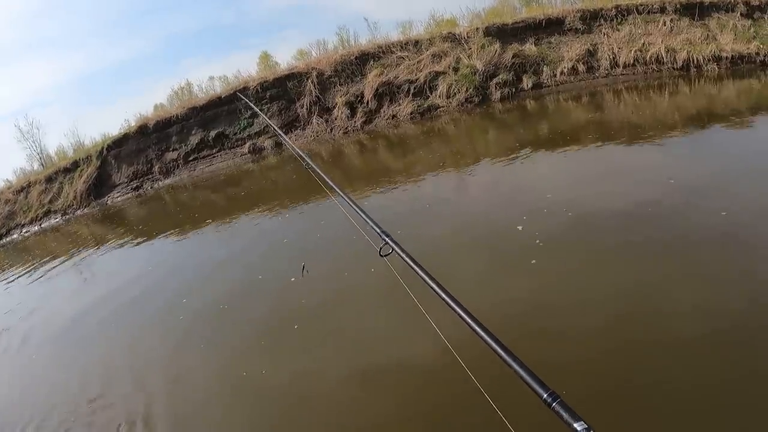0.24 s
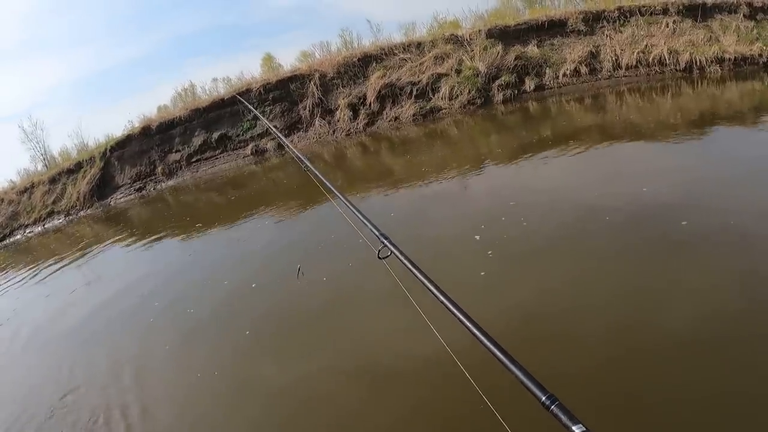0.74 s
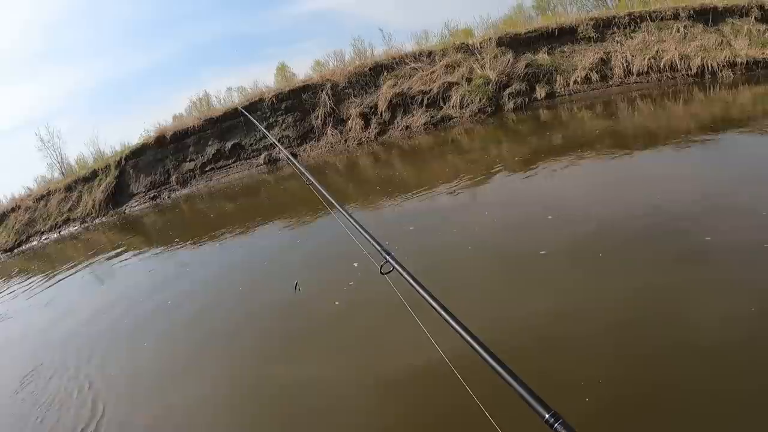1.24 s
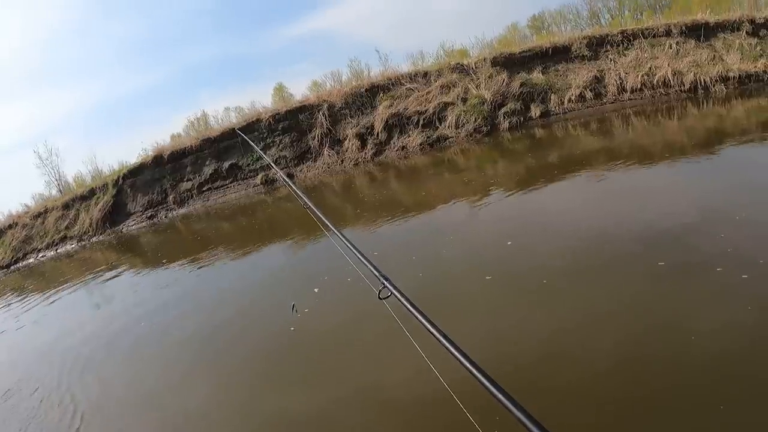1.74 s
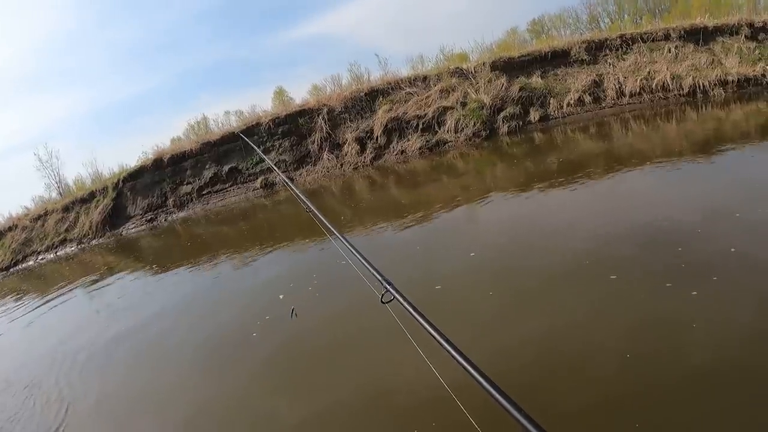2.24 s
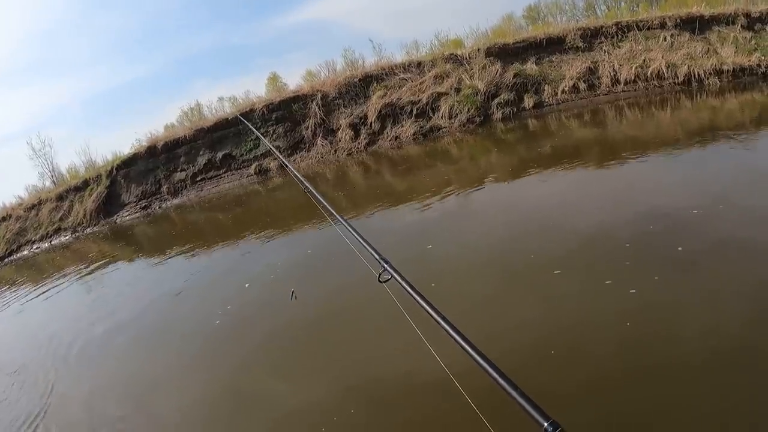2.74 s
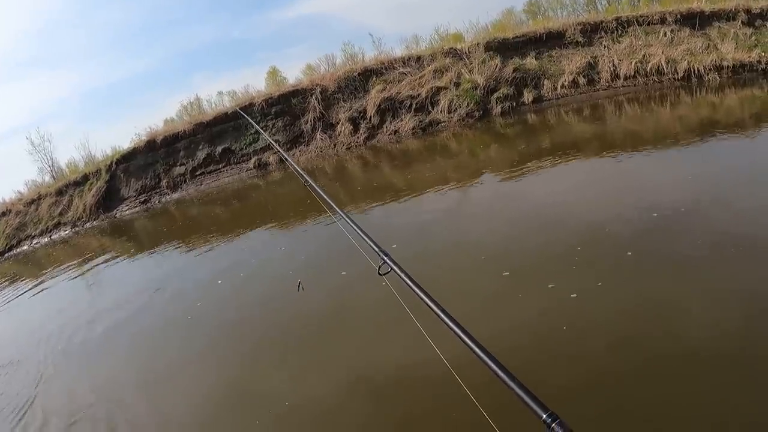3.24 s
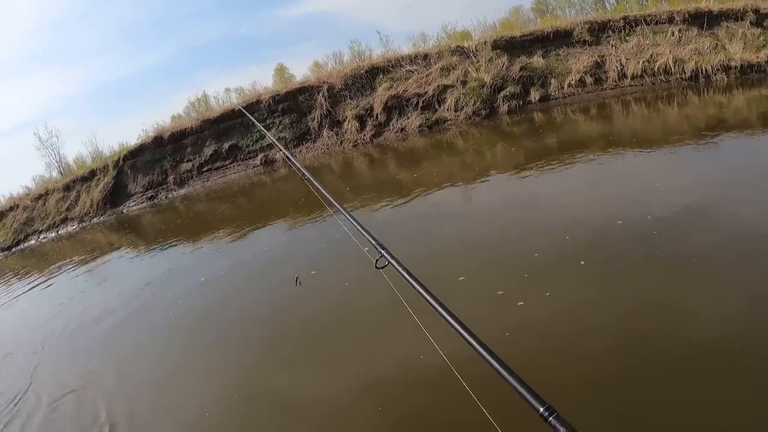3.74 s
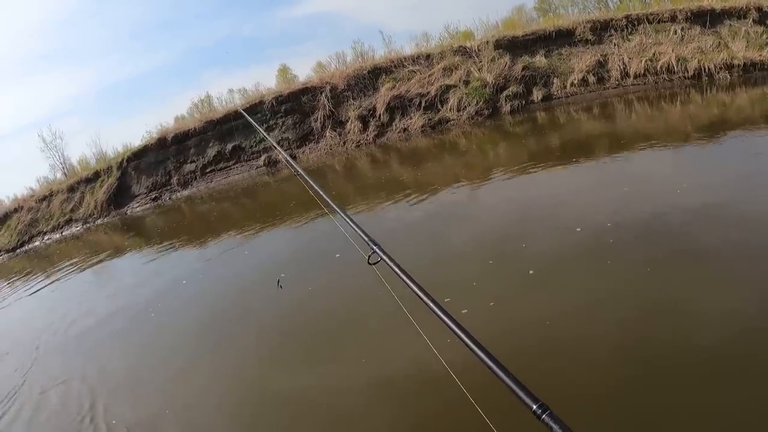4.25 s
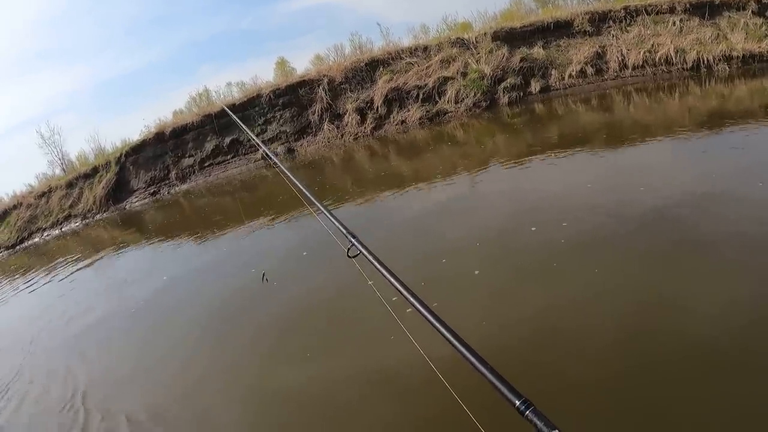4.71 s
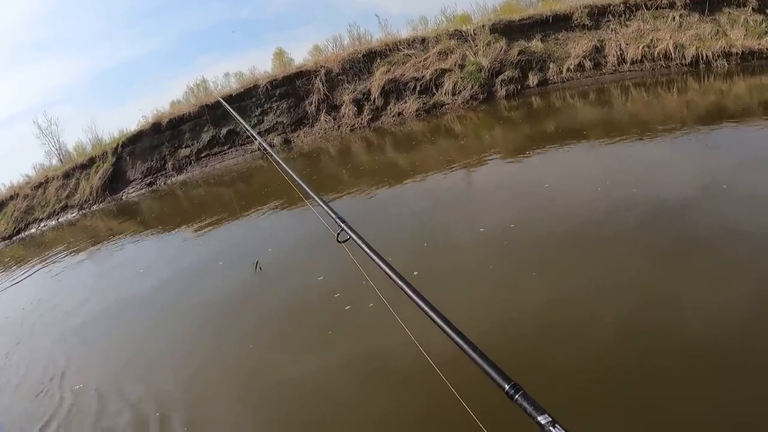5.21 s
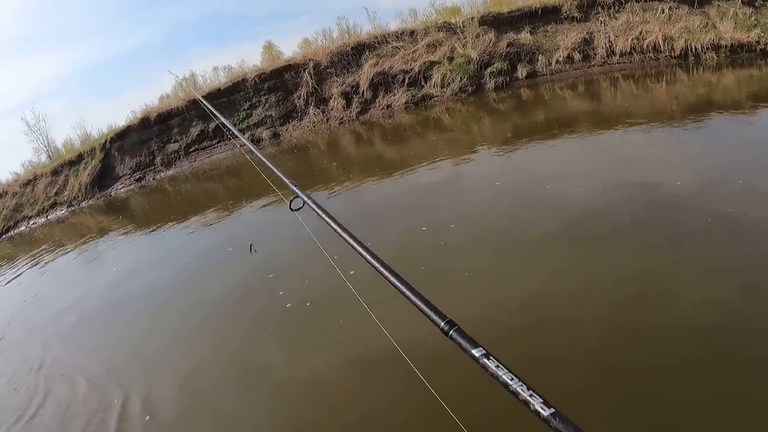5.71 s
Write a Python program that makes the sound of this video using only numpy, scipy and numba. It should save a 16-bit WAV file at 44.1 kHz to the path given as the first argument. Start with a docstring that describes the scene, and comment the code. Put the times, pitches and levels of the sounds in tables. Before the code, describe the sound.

Outdoors on a river, a wooden box turkey call gives one short cluck, then twelve raspy, evenly spaced yelps close to the microphone.

```python
"""Wind rumble and river hush, a bird trill and small gear clicks; then a turkey call close by: a cluck, twelve yelps.
Call: uneven stick-slip pulses ring a wooden box, with clean squeaks where a stroke catches, locks or lets go.
Behind it: the far bank's faint echo (scattered noise), a wavering motor drone (two sines), the trill (falling sines).
In the boat: clicks and rustles (filtered noise), knocks (decaying hull modes). Air: noise bands moved by gusts."""
import sys
import numpy as np
from scipy import signal
from scipy.io import wavfile
from scipy.ndimage import uniform_filter1d, minimum_filter1d
from numba import njit

SR = 44100
rng = np.random.default_rng(int(sys.argv[2]) if len(sys.argv) > 2 else 0)


def digitize_waveform(pressure):
    """Quantize a signal to 16-bit integers and store it at the path in sys.argv[1].

    Rows of a 2-D input are taken as channels; values are limited to [-1, 1].
    """
    field = np.atleast_2d(pressure).T
    bounded = np.clip(field, -1, 1)
    quanta = np.round(bounded * 32767).astype(np.int16)
    wavfile.write(sys.argv[1], SR, quanta)


N = 263277  # samples


def undb(db):
    """Decibels to amplitude."""
    return 10 ** (np.asarray(db) / 20)


def unit(x):
    """Scale to rms 1."""
    return x / np.sqrt(np.mean(x ** 2))


@njit
def svf(x, hz, width_hz):
    """State-variable band-pass with a movable centre, gain 1 at the centre."""
    y = np.empty(len(x))
    band_state, low_state = 0., 0.
    for i in range(len(x)):
        g = np.tan(np.pi * hz[i] / SR)
        damping = width_hz / hz[i]
        v = (band_state + g * (x[i] - low_state)) / (1 + g * (g + damping))
        band_state = 2 * v - band_state
        low_state += 2 * g * v
        y[i] = damping * v
    return y


def band(x, hz, width_hz):
    """Steep band: the resonance applied twice."""
    hz = hz + np.zeros(len(x))
    once = svf(x, hz, 1. * width_hz)
    return svf(once, hz, 1. * width_hz)


def walk(rate_hz):
    """Random levels held 1 / rate_hz and slewed twice; spread near 1."""
    hold = int(SR / rate_hz)
    steps = np.repeat(rng.standard_normal(N // hold + 1), hold)
    return 1.3 * uniform_filter1d(uniform_filter1d(steps, hold), hold)[:N]


def add(track, start_s, sound):
    """Mix a short sound in at start_s."""
    i = int(start_s * SR)
    track[i:i + len(sound)] += sound[:N - i]


def decay(t, t60_s):
    """Exponential fall of 60 dB in t60_s."""
    return np.exp(-np.log(1000) * t / t60_s)


def glide(length_s, from_hz, to_hz, lateness, roundness):
    """Sine gliding under a round envelope, and the envelope."""
    u = np.linspace(0, 1, int(length_s * SR))
    shape = np.abs(np.sin(np.pi * u ** lateness)) ** roundness
    phase = 2 * np.pi * np.cumsum(from_hz + (to_hz - from_hz) * u) / SR
    return shape * np.sin(phase), shape


# air spectrum: (centre_hz, relative_density_db)
AIR_SPECTRUM = [(7.1, -26), (12, 3), (38, -11.5), (75, -18), (114, -20), (274, -36), (308, -39), (426, -29),
                (467, -41), (708, -45), (833, -35.5), (1390, -51), (2200, -64), (3050, -63.5), (3960, -89),
                (6710, -120)]
# wind gusts, used about their mean: (time_s, rumble_db)
GUSTS = [(0.0, -45), (1.71, -45), (1.76, -38.5), (1.96, -45.5), (3.86, -43), (3.94, -37), (4.19, -44.5),
         (5.8, -46), (5.97, -36.5)]
AIR_RMS_DB, FLICKER_DB = -36, 1.5


def air():
    """Wind and river hush in half-octave noise bands; gusts move the lowest most."""
    time_s, gust_db = np.transpose(GUSTS)
    gust_db = np.interp(np.arange(N) / SR, time_s, gust_db - gust_db.mean())
    centre_hz, density_db = np.transpose(AIR_SPECTRUM)
    out = 0
    for hz in 12 * 2 ** np.arange(0, 8.6, .5):
        level_db = np.interp(np.log(hz), np.log(centre_hz), density_db)
        level_db = level_db + gust_db * min(40 / hz, 1) + FLICKER_DB * walk(7.1)
        out = out + undb(level_db) * band(rng.standard_normal(N), hz, hz / 2)
    return undb(AIR_RMS_DB) * unit(out)


# far motor, before wavering: (time_s, firing_hz, second_partial_db, third_partial_db)
DRONE = [(0, 145.4, -64.5, -57), (1.001, 142.3, -57.5, -63.5), (1.598, 137.4, -56.5, -83),
         (2.4, 137.1, -68.5, -68.5), (3.8, 141.6, -69, -62), (4.602, 148.3, -62.5, -60),
         (5.299, 154, -69.5, -56), (5.97, 151.5, -80.5, -63)]


def motor():
    """Far engine: partials two and three of the firing rate, wavering in pitch and level."""
    time_s, *columns = np.transpose(DRONE)
    firing_hz, second_db, third_db = (np.interp(np.arange(N) / SR, time_s, c) for c in columns)
    phase = 2 * np.pi * np.cumsum(firing_hz * (1 + 0.0094 * walk(4.0))) / SR
    second = undb(second_db + 0.83 * walk(5)) * np.sin(2 * phase)
    third = undb(third_db + 2.5 * walk(12)) * np.sin(3 * phase)
    return second + third


# trill, low then high note: (first_note_s, period_s, mid_pitch_hz)
TRILL = [(.04, .0884, 3320), (.008, .0893, 5090)]
# same rows: (first_note_peak_db, growth_db_per_note)
TRILL_LEVELS = [(-63, 0.44), (-75, 0.5)]
TRILL_NOTES, NOTE_S, NOTE_FALL_HZ = 9, .032, 80


def bird():
    """Two pitches in turn: short whistles that each fall a little, evenly paced, slowly louder."""
    out = np.zeros(N)
    for (first_s, period_s, hz), (peak_db, growth_db) in zip(TRILL, TRILL_LEVELS):
        note, _ = glide(NOTE_S, hz + NOTE_FALL_HZ / 2, hz - NOTE_FALL_HZ / 2, 0.57, 0.83)
        for k in range(TRILL_NOTES):
            add(out, first_s + k * period_s, undb(peak_db + k * growth_db) * note)
    return out


# cloth and gear, level before the fade: (start_s, length_s, rms_db, centre_hz, filter_width_hz)
RUSTLES = [(.69, 0.087, -60, 600, 700), (1.857, 0.12, -60, 502, 708), (5.771, 0.22, -71, 5500, 6020),
           (5.768, 0.06, -55.5, 594, 800)]


def rustle():
    """Cloth and gear: patchy noise grains under a rounded fade in and out."""
    out = np.zeros(N)
    grains = undb(3.5 * walk(150)) * rng.standard_normal(N)
    for start_s, length_s, rms_db, hz, width_hz in RUSTLES:
        piece = grains[int(start_s * SR):int((start_s + length_s) * SR)]
        fade = np.hanning(len(piece)) ** .5
        add(out, start_s, undb(rms_db) * unit(band(piece, hz, width_hz)) * fade)
    return out


# gear clicks and scuffs: (start_s, peak_db, ring_hz)
CLICKS = [(0.0864, -35, 3360), (0.1657, -54, 3330), (.3548, -53, 6300), (.4744, -34, 3880),
          (0.537, -49, 4400), (0.6445, -39, 3700), (0.652, -32, 3680), (0.69, -54, 3900), (.735, -59, 3347),
          (3.7755, -51, 2940), (3.8107, -54.5, 3080), (5.7709, -44, 6360), (5.7833, -49, 5540),
          (5.8675, -55, 5730)]
CLICK_T60_S, CLICK_ATTACK_S = .012, .0008


def clicks():
    """Small hard contacts: brief noise bursts through a ring, a body and a treble band."""
    out, t = np.zeros(N), np.arange(4000) / SR
    for start_s, peak_db, ring_hz in CLICKS:
        burst = rng.standard_normal(4000) * decay(t, CLICK_T60_S) * (1 - np.exp(-t / CLICK_ATTACK_S))
        click = band(burst, ring_hz, 1700)
        click = click + 0.6 * band(burst, 1300, 2200) + 0.051 * band(burst, 7000, 6000)
        add(out, start_s, undb(peak_db) * click / np.abs(click).max())
    return out


# hull modes: (mode_hz, relative_level_db, t60_s)
HULL = [(187.8, 8.5, 0.089), (348, -4, .15), (463, -4, 0.096), (576, -7, 0.029), (678, 5, 0.014)]
# knocks: (time_s, peak_db, brightness_db); brightness lifts every mode but the first
KNOCKS = [(0.146, -37, 7), (0.701, -34.5, 13), (0.723, -56, 4), (0.761, -37.5, 4), (1.835, -16, -5),
          (5.804, -33, -2)]


def knocks():
    """Soft blows ring the hull's low modes; its many higher modes merge into a short rattle."""
    out, t = np.zeros(N), np.arange(int(.25 * SR)) / SR
    for time_s, peak_db, bright_db in KNOCKS:
        ring = 0
        for k, (hz, level_db, t60_s) in enumerate(HULL):
            mode = decay(t, t60_s) * np.sin(2 * np.pi * hz * t)
            ring = ring + undb(level_db + bright_db * (k > 0)) * mode
        rattle = band(rng.standard_normal(len(t)), 560, 480) * decay(t, 0.16)
        knock = ring * (1 - np.exp(-t / 0.004)) + undb(0.62 * bright_db + 7.5) * rattle
        add(out, time_s - .003, undb(peak_db) * knock / np.abs(knock).max())
    return out


BANK_S, BANK_SPREAD_S, BANK_DB = .09, .018, -71.5  # delay, decay constant, gain
NEAR_S, NEAR_DB = .017, -58.5  # decay constant, gain


def bank_echo(x):
    """Near ground and water return a short smear; the steep bank a later, scattered echo."""
    t = np.arange(int(.4 * SR)) / SR
    late = np.clip(t - BANK_S, 0, None) / BANK_SPREAD_S
    bank = undb(BANK_DB) * (late > 0) * np.exp(-late)
    near = undb(NEAR_DB) * np.exp(-t / NEAR_S)
    return signal.fftconvolve(x, rng.standard_normal(len(t)) * (bank + near))[:N]


# strokes, layer levels before shaping: (bite_s, attack_s, length_s, bite_db, swell_db, letting_go_db,
# upper_bite_hz, upper_swell_hz, lower_hz, lower_db, second_partial_db, scrape_db, fizz_db)
STROKES = [(0.4876, .011, .012, -2.5, -10, -10, 1500, 1600, 999, -6, -1.5, -23.5, -44),
           (2.489, .024, .046, -10.5, -11.5, -10, 1405, 1290, 888.7, -1, -1.5, -25, -42.5),
           (2.739, .012, .076, -21.5, -5.5, -6.5, 1600, 1680, 939.2, -1, -4.5, -27.5, -50.5),
           (3.012, .016, .08, -23.5, -8.5, -18.5, 1530, 1356, 973.7, -3, -12, -24.5, -54.5),
           (3.333, .014, .07, -10, -9.5, -25, 1600, 1600, 998.3, 0.5, -8, -23.5, -50),
           (3.599, .014, .093, -12.5, -9.5, -23, 1536, 1381, 1021, -2, -8.5, -23.5, -53),
           (3.88, .018, .094, -12.5, -10, -27, 1498, 1341, 963.5, -1.5, -14.5, -23.5, -56.5),
           (4.147, .016, .082, -13, -9.5, -13, 1530, 1380, 1019, -4, -11, -22.5, -55),
           (4.431, .022, .086, -11.5, -11, -19.5, 1500, 1380, 980.8, -4, -10.5, -23.5, -63.5),
           (4.698, .024, .07, -11, -11, -18.5, 1564, 1460, 974.7, -3, -14.5, -22.5, -63),
           (4.958, 0.01, .078, -16.5, -9.5, -20.5, 1671, 1630, 986.7, -8.5, -20.5, -26.5, -66.5),
           (5.236, .012, .078, -12, -11, -14.5, 1690, 1560, 1000, -6.5, -23.5, -25, -63),
           (5.501, .01, .074, -15.5, -9.5, -16.5, 1629, 1470, 966.4, -6, -19, -23.5, -54.5)]
# scatter of the slips: one value a stroke (log scale, no unit)
UNEVEN = [.1, .07, .08, .3, .09, .2, .25, .22, .3, .25, .15, .12, .14]
# offsets on a stroke's layer level: (touch_db, bite_db, swell_db, letting_go_db, lift_db)
LOWER_SHAPE = (-3.5, -3.5, -2.1, -4.5, 0)
# the same five columns [dB], for the ring on the slips' second partial, below the lower ring
SECOND_PARTIAL_SHAPE = (-0.95, -3.5, -1.2, -15.5, -6)
# the same five columns [dB], for the scrape and the fizz
SCRAPE_SHAPE = (11, -1.5, 1.42, -4, 10)
FIZZ_SHAPE = (18, -2.5, -1.1, 4.5, 21.5)
SWELL_AT = 0.58  # share of the length
TOUCH_DB, LIFT_DB = -48.5, -79  # as the lid touches, after it has lifted
RELEASE_S, RELEASE_SHARE = .025, .75  # longest release; its limit as a share of the length
LOWER_RISE = 0.022  # the lower ring climbs by this share over a stroke


def strokes():
    """Hand on the lid: controls at touch, bite, swell, letting go and lift, joined by lines."""
    rows = []
    for (bite_s, attack_s, length_s, bite_db, swell_db, go_db, bite_hz, swell_hz,
         lower_hz, lower_db, second_partial_db, scrape_db, fizz_db) in STROKES:
        release_s = min(RELEASE_S, RELEASE_SHARE * length_s)
        along = np.array([0, 0, SWELL_AT, 1, 1])
        rows.append([bite_s + along * length_s + [-attack_s, 0, 0, 0, release_s],
                     [TOUCH_DB, bite_db, swell_db, go_db, LIFT_DB],
                     [bite_hz, bite_hz, swell_hz, swell_hz, swell_hz],
                     lower_hz * (1 + LOWER_RISE * (along - .5)),
                     second_partial_db + np.array(SECOND_PARTIAL_SHAPE),
                     lower_db + np.array(LOWER_SHAPE),
                     scrape_db + np.array(SCRAPE_SHAPE),
                     fizz_db + np.array(FIZZ_SHAPE)])
    t = np.arange(N) / SR
    uneven = sum(u * ((t >= row[0][0]) & (t <= row[0][-1])) for u, row in zip(UNEVEN, rows))
    time_s, *columns = np.concatenate(rows, axis=1)
    return uneven, [np.interp(t, time_s, c) for c in columns]


@njit
def slip(hz, uneven, chance):
    """A pulse at each slip; unevenness varies how long the wood sticks and how hard it lets go."""
    out = np.zeros(len(hz) + 1)
    phase, k = 0., 0
    for i in range(len(hz)):
        step = hz[i] * np.exp(uneven[i] * chance[k, 0]) / SR
        phase += step
        if phase >= 1:
            phase -= 1
            k += 1
            size = np.exp(uneven[i] * chance[k, 1])
            out[i] += size * phase / step  # pulse split between two samples
            out[i + 1] += size * (1 - phase / step)
    return out[:-1]


# catches, locks and releases: (start_s, length_s, from_hz, to_hz, peak_db, lateness, hush)
# lateness [exponent]: higher peaks later; hush [0-1]: how strongly it silences the rasp
SQUEAKS = [(0.4928, 0.012, 1192, 1800, -4.5, 0.23, 0.81), (2.495, .01, 862, 854, -12, 1.36, 0.18),
           (2.517, 0.018, 927, 900, -13, 1.1, 0.35), (2.526, 0.023, 1172, 1189, -18, 0.67, 0.71),
           (2.779, 0.033, 912, 948, -9.5, 0.64, 0.56), (2.78, .029, 1852, 1950, -15, 0.59, 0.23),
           (2.803, 0.021, 1152, 1416, -14, 1.2, .95), (3.083, 0.017, 1289, 1446, -22.5, 1.05, .95),
           (3.392, 0.012, 1340, 1454, -16, 0.64, 0.74), (3.681, 0.013, 1433, 1466, -14.5, 0.94, .95),
           (3.962, 0.013, 1367, 1477, -12, 1.8, .95), (4.219, .014, 1485, 1531, -10, 2.1, .95),
           (4.51, 0.01, 1480, 1620, -15, 1.9, 0.65), (4.755, .015, 1442, 1500, -11.5, 2.9, 1),
           (4.955, 0.019, 2241, 1312, -15, 2.1, 0.86), (5.025, 0.016, 1380, 1615, -10.5, 0.56, 0.87),
           (5.231, 0.014, 2220, 1280, -14.5, 1.54, 0.99), (5.284, 0.034, 1336, 1492, -10.5, 3.1, 0.66),
           (5.495, .017, 2153, 1340, -24, 1.3, 0.8), (5.552, 0.027, 1364, 1430, -10, 2.4, 0.72)]


def squeaks():
    """Contact locked on one ring: gliding sines, and how steady the contact is."""
    squeak, steady = np.zeros(N), np.zeros(N)
    for start_s, length_s, from_hz, to_hz, peak_db, lateness, hush in SQUEAKS:
        tone, shape = glide(length_s, from_hz, to_hz, lateness, 0.63)
        add(squeak, start_s, undb(peak_db) * tone)
        add(steady, start_s, shape * np.clip(hush, 0, 1))
    return squeak, steady


def ring_at(x, hz, width_hz):
    """One ring, which the wandering contact feeds now more, now less."""
    return undb(3 * walk(90)) * band(x, hz, width_hz)


# box modes: (mode_hz, filter_width_hz, relative_level_db)
BOX = [(1320, 120, 0), (1600, 130, -1), (1830, 120, -2), (2050, 170, -7)]
# scrape bands: (centre_hz, filter_width_hz, relative_level_db)
SCRAPE = [(2485, 610, 3), (3094, 300, 4.5), (3560, 480, 1.5), (4350, 57, -14.5), (5370, 1200, -12.5),
          (5750, 320, -15.5), (7675, 350, -10.5)]
# fizz bands: (centre_hz, filter_width_hz, relative_level_db)
FIZZ = [(9500, 580, 0), (11300, 1300, 0.5), (13500, 1500, -10)]
TING_HZ, TING_WIDTH_HZ, TING_DB, TING_LINGER_S = 7710, 480, -56.5, 0.0085  # high ring outlasting the stroke


def turkey_call():
    """Slips at a third of the lower ring's pitch put partials two and three under the box modes."""
    uneven, (db, upper_hz, lower_hz, second_partial_db, lower_db, scrape_db, fizz_db) = strokes()
    slips = unit(slip(lower_hz / 3, uneven, rng.standard_normal((N // 30, 2))))
    rub = slips + 1.8 * uneven * rng.standard_normal(N)  # grit between the slips

    held = svf(rub, upper_hz, 390.0)  # the grip favours one part of the box modes
    upper = unit(sum((-1) ** k * undb(level_db) * ring_at(held, hz, width_hz)
                     for k, (hz, width_hz, level_db) in enumerate(BOX)))
    lower = undb(lower_db) * unit(ring_at(rub, lower_hz, 210))
    second_partial = undb(second_partial_db) * unit(ring_at(rub, lower_hz * 2 / 3, 170))

    grit = 0.15 * slips + undb(1 * walk(220)) * rng.standard_normal(N)
    scrape = undb(scrape_db) * unit(sum(undb(d) * band(grit, hz, w) for hz, w, d in SCRAPE))
    fizz = undb(fizz_db) * unit(sum(undb(d) * band(grit, hz, w) for hz, w, d in FIZZ))
    squeak, steady = squeaks()

    upper_share = np.sqrt(np.clip(1 - undb(lower_db) ** 2 - undb(second_partial_db) ** 2, .1, 1))
    light = undb(.6 * np.minimum(db + 20, 0))  # a light touch barely wakes the lower rings
    ring = upper_share * upper + light * (lower + second_partial)
    swing = np.sqrt(uniform_filter1d(ring ** 2, size=70) + 0.017)
    ring = ring / swing ** .4  # the rasp's loudest swings are evened out
    ring = ring * (1 - .94 * np.clip(steady, 0, 1) ** .7)  # a steady squeak replaces the rasp
    rasp = ring + (scrape + fizz) * swing * (1 - 0.52 * steady)
    level = (uneven > 0) * undb(db)
    call = level * rasp + squeak

    fade = np.exp(-1 / (TING_LINGER_S * SR))
    linger = signal.lfilter([1 - fade], [1, -fade], level)
    ting = unit(ring_at(grit, TING_HZ, TING_WIDTH_HZ))
    call = call + undb(TING_DB) * linger ** 0.72 * ting
    # the small box radiates little bass
    return signal.sosfilt(signal.butter(3, 430, "high", fs=SR, output="sos"), call)


def scene():
    """Background, boat, call and echo summed to one channel."""
    call = turkey_call()
    background = air() + motor() + bird()
    boat = rustle() + clicks() + knocks()
    return (background + boat + bank_echo(call) + call)[None, :]


HISS_GAIN_DB, TOP_HZ = -73.5, 15750


def record(dry):
    """A limiter holds the loudest peaks; hiss is added and the top cut steeply."""
    hiss = svf(rng.standard_normal(N), np.full(N, 6000.), 11000.0)
    peak = -minimum_filter1d(-np.abs(dry), size=130)  # running maximum
    peak = uniform_filter1d(peak, size=130)
    held = dry * np.minimum(1, .89 / peak)
    top_cut = signal.ellip(10, .2, 80, TOP_HZ, fs=SR, output="sos")
    return signal.sosfilt(top_cut, held + undb(HISS_GAIN_DB) * hiss)


dry = scene()
out = record(dry)
digitize_waveform(out)
```